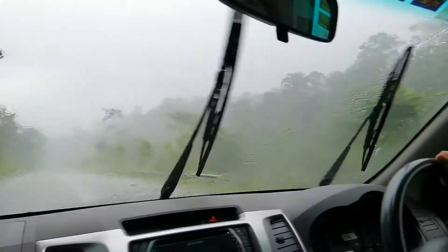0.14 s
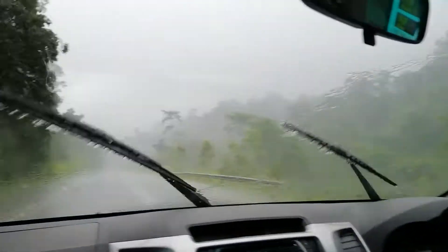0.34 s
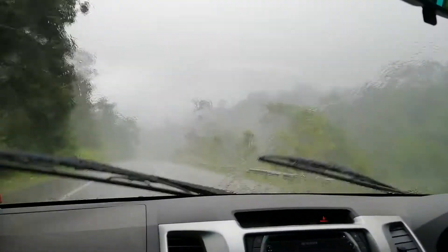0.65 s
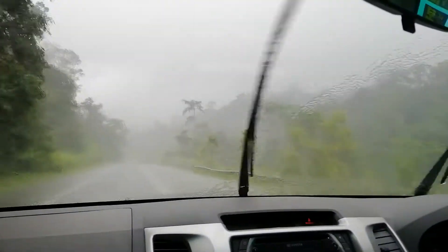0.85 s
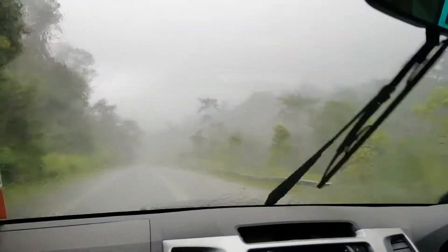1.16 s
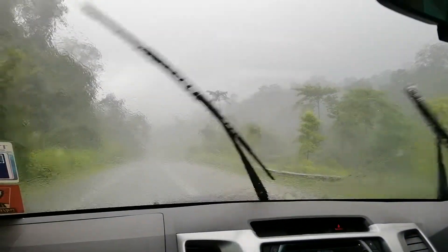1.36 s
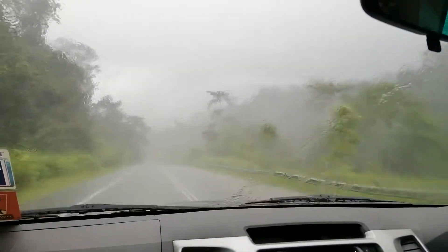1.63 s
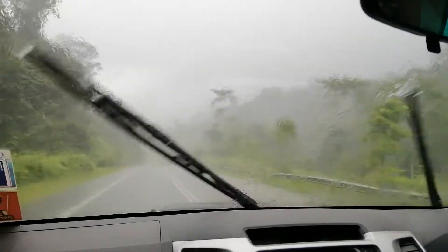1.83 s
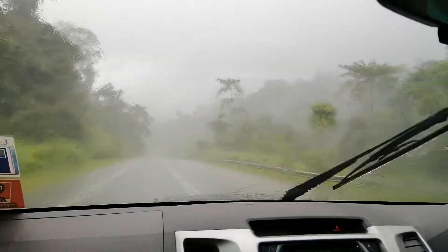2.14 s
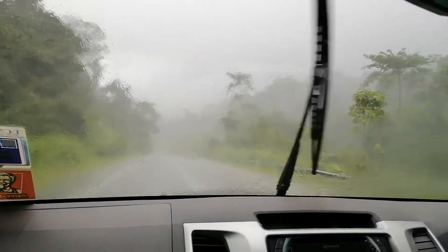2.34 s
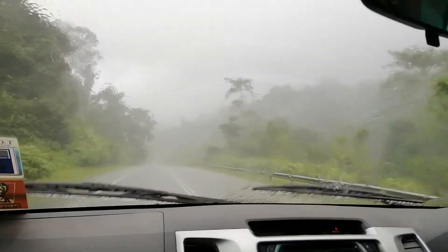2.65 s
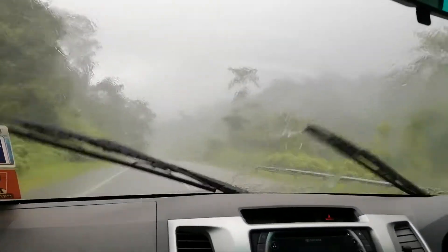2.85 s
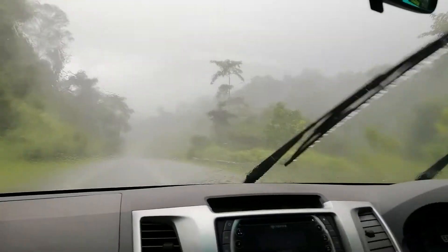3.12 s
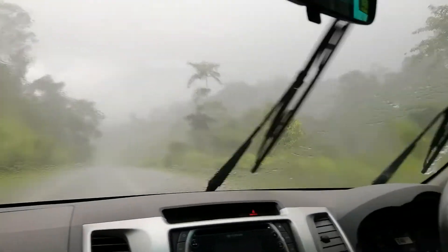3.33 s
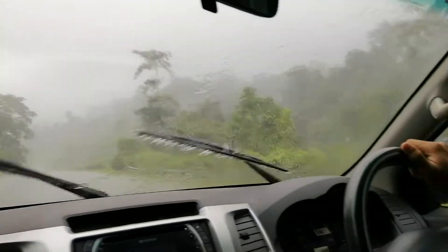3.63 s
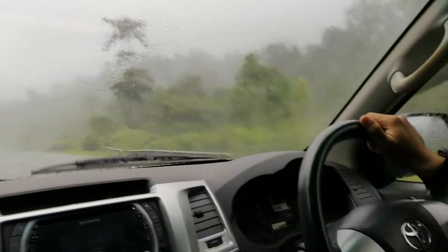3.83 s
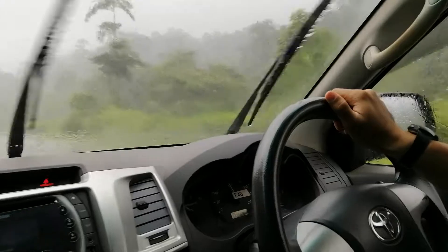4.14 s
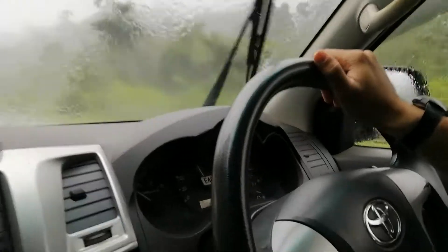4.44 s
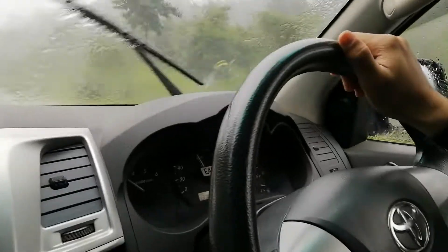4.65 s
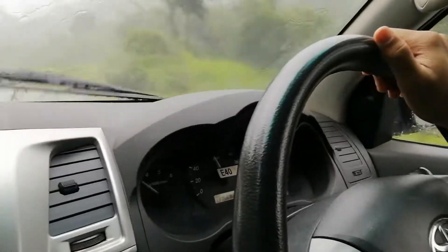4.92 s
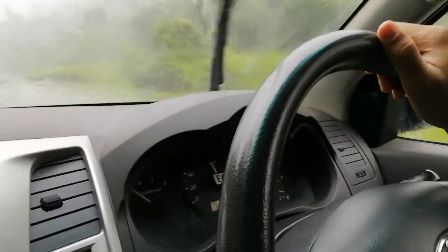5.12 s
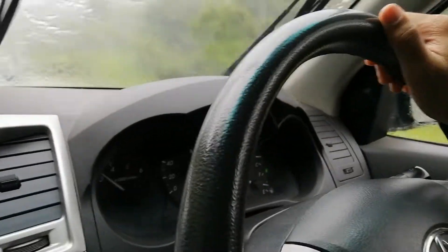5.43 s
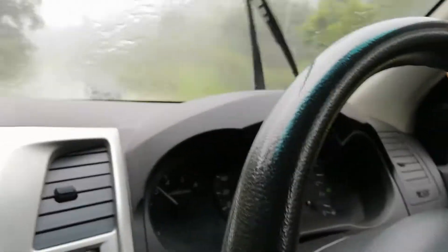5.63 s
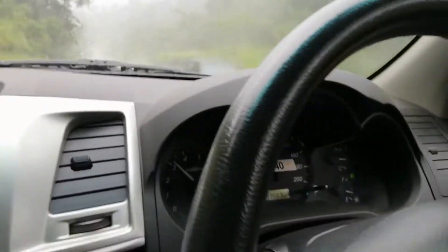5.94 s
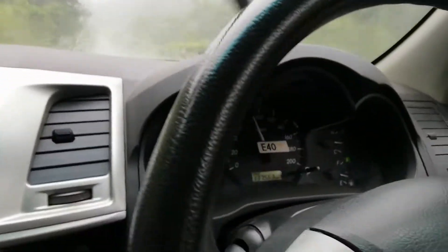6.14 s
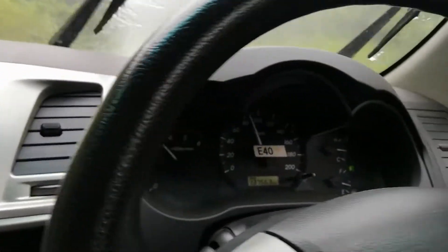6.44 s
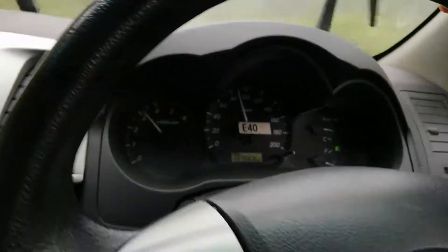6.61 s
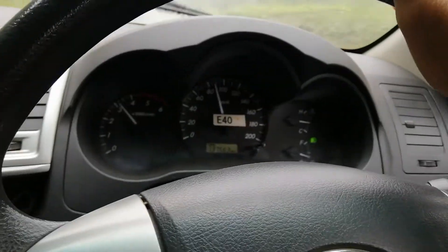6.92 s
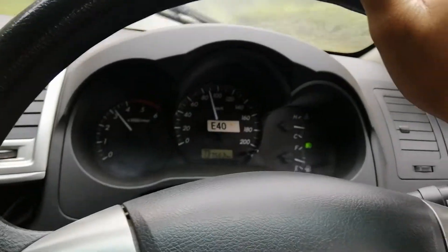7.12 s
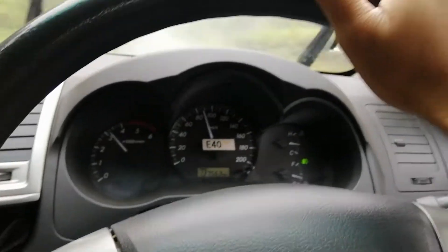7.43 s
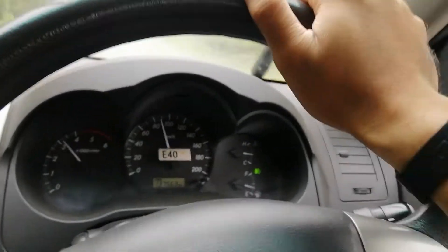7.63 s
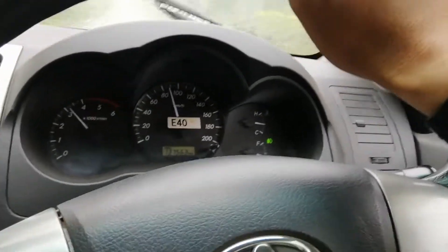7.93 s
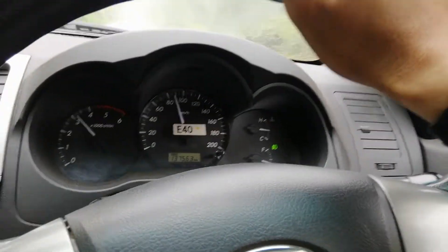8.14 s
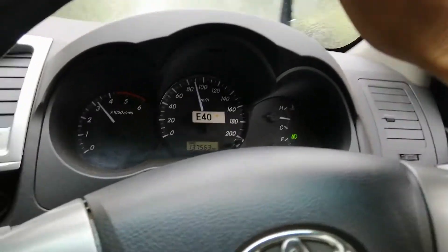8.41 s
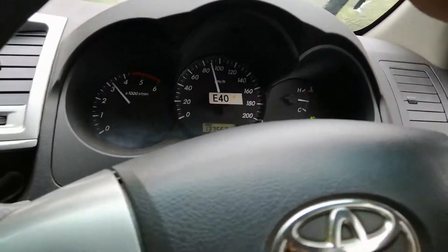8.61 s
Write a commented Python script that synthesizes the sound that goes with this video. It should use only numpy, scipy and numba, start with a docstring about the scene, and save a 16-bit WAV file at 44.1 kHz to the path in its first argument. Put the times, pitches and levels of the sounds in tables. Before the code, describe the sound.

A deep engine drone fills a vehicle cabin while a cloudburst hammers windscreen and bodywork, with occasional metallic drop pings and faint wiper taps.

```python
"""A four-cylinder diesel booms in a pickup cabin and eases off half way: sines at the firing rate and crank orders.
Drive-line sines throb in step with it; filtered noise makes the tyre rumble, with one brief drumming of the body.
A cloudburst patters on the windscreen and rings the panels: random hits shaped by the spectra of glass and metal.
A few fat drops ping as damped sines; the wipers tap faintly, as band-passed noise bursts, at each turn."""
import sys
import numpy as np
from scipy import signal
from scipy.fft import rfft, irfft
from scipy.io import wavfile
from scipy.ndimage import uniform_filter1d
from numba import njit

SR = 44100
rng = np.random.default_rng(int(sys.argv[2]) if len(sys.argv) > 2 else 0)


def store_wav(level_fs):
    """Save 16-bit WAV to argv[1]."""
    pcm = np.round(np.clip(np.atleast_2d(level_fs), -1, 1) * 32767)
    wavfile.write(sys.argv[1], SR, pcm.T.astype(np.int16))


N = 386757
TIME = np.arange(N) / SR  # s
FREQS = np.maximum(np.fft.rfftfreq(N, 1 / SR), 1)  # Hz
SIDES = np.array([[1], [-1]])  # left, right
SHORT_TIME = TIME[:2048]  # s, span of one hit


def undb(db):
    """Decibels to amplitude gain."""
    return 10 ** (np.asarray(db) / 20)


def unit(x):
    """Scale to rms 1."""
    return x / np.sqrt(np.mean(x ** 2))


def curves(table):
    """Columns of a time table, interpolated to every sample."""
    time_s, *columns = np.transpose(table)
    return [np.interp(TIME, time_s, column) for column in columns]


def across(table):
    """Columns of a frequency table, interpolated on a log-frequency axis."""
    freq_hz, *columns = np.transpose(table)
    return np.array([np.interp(np.log(FREQS), np.log(freq_hz), column) for column in columns])


def colour(x, gain):
    """Filter by a gain per frequency."""
    return irfft(rfft(x) * gain, N)


def bell(centre_hz, relative_width):
    """Gaussian band on a log-frequency axis, peak 1."""
    return np.exp(-(np.log(FREQS / centre_hz) / relative_width) ** 2)


def swell(at_s, width_s):
    """Smooth rise and fall around one moment, peak 1."""
    return np.exp(-((TIME - at_s) / width_s) ** 2)


def walk(rate_hz):
    """Smooth random drift, rms 1: random steps at rate_hz, averaged over one step."""
    step = int(SR / rate_hz)
    steps = np.repeat(rng.standard_normal(N // step + 1), step)
    return unit(uniform_filter1d(steps, step)[:N])


def decay(t60_s):
    """Exponential decay, down 60 dB after t60_s."""
    return np.exp(-np.log(1000) * SHORT_TIME / t60_s)


def add(track, start_s, sound):
    """Mix a short stereo sound into a track."""
    i = int(start_s * SR)
    track[:, i:i + sound.shape[1]] += sound[:, :N - i]


# firing rate, sags as the throttle eases, then creeps back: time_s, firing_hz
FIRING_RATE = [(0, 109.6), (1.0, 108.9), (3.3, 108.8), (4.08, 108.6), (4.25, 106.4), (4.42, 107.8),
               (5.1, 105.7), (5.65, 106.8), (5.9, 106), (7.3, 107.3), (8.77, 107.4)]
# throttle: time_s, load (0-1)
THROTTLE = [(0, 0.99), (3.9, 0.65), (4.4, 0), (8.77, 0)]
# cabin boom before the dip: time_s, level_db
BOOM_LEVEL = [(0, -12.4), (3.3, -12.0), (4.0, -12.5), (4.75, -12.0), (5.15, -13), (5.45, -14), (6.25, -13),
              (7.2, -14.2), (7.9, -13.5), (8.55, -15.5), (8.77, -12.5)]
DIP_S, DIP_WIDTH_S, DIP_DB = 0.16, 0.04, -4.5  # the boom dips briefly
# crank orders, levels relative to the boom: order (x crank rate), loaded_db, eased_db
CRANK_ORDERS = [(2.5, -23.5, -22), (3, -17, -36), (3.5, -27, -34), (4, -33, -26.5), (4.5, -24, -35),
                (5, -37, -33), (5.5, -48, -41), (6, -44, -29.5), (6.5, -49, -35.5), (9, -35, -39.5)]
# shaft and tyres: ratio (x firing rate), level_db
DRIVE_LINE = [(.352, -26.8), (3.55, -49), (3.89, -52), (4.11, -48)]


def engine():
    """The firing rate excites a cabin resonance; weaker crank orders waver and change with load."""
    firing_hz, = curves(FIRING_RATE)
    load, = curves(THROTTLE)
    boom_db = curves(BOOM_LEVEL)[0] + DIP_DB * swell(DIP_S, DIP_WIDTH_S)
    firing_rad = 2 * np.pi * np.cumsum(firing_hz) / SR
    out = np.sin(firing_rad + 0.11 * SIDES) * undb(0.27 * walk(14))
    for order, loaded_db, eased_db in CRANK_ORDERS:
        # two crank turns hold four firings: order / 2 per firing, in quarter steps
        phase_rad = round(2 * order) / 4 * firing_rad + 2 * np.pi * rng.random() + 0.13 * walk(6)
        level_db = eased_db + load * (loaded_db - eased_db) + 1.1 * walk(7.4)
        out = out + undb(level_db) * np.sin(phase_rad + 0.036 * order * SIDES)
    out = out * undb(boom_db)
    # in gear, shaft and tyres turn in step with the engine
    for ratio, level_db in DRIVE_LINE:
        wavering_db = level_db + 1.6 * walk(7)
        out = out + undb(wavering_db) * np.sin(ratio * firing_rad + 0.35 * walk(6))
    return np.sqrt(2) * out


# listener leans from windscreen to driver's door: time_s, door_share (0-1)
DOOR_SHARE = [(0, 0.03), (4.8, 0.04), (5.8, 0.03), (6.5, 0.81), (8.77, 0.95)]


def lean():
    """Door share over time: 0 at the windscreen, 1 at the door."""
    return curves(DOOR_SHARE)[0]


# tyre rumble spectrum, relative density: freq_hz, level_db
ROAD_SPECTRUM = [(15, -15), (33, 7), (48, 0), (65, 1.5), (85, -1.5), (130, -1.5), (190, -3.5), (275, -14.5),
                 (390, -14.5), (480, -17.5), (570, -20.5), (900, -25), (2000, -57)]
# left/right likeness of the rumble: freq_hz, correlation (-1 to 1)
ROAD_CORRELATION = [(40, 0.98), (130, 1), (200, 0.8), (300, 0.44), (420, -0.083), (560, -0.64),
                    (900, -0.92)]


def road(mean_db=-24.0, arch_db=3.0):
    """Tyre rumble through the body: bass fills the cabin evenly, higher modes oppose from side to side."""
    likeness = np.clip(across(ROAD_CORRELATION), -1, 1)
    spectrum = undb(across(ROAD_SPECTRUM))
    mid = colour(rng.standard_normal(N), spectrum * np.sqrt(1 + likeness))
    side = colour(rng.standard_normal(N), spectrum * np.sqrt(1 - likeness))
    rumble = unit(mid + SIDES * side) * undb(mean_db + 1.14 * walk(5))
    # water thrown into the wheel arch roars more near the door
    arch = colour(rumble, bell(400, 0.21))
    return rumble + (undb(arch_db * lean()) - 1) * arch


def rough_patch(at_s=6.45, width_s=0.17, centre_hz=67, peak_db=-20):
    """The body drums briefly over rougher road: one low sine of drifting pitch."""
    drum_hz = centre_hz + 3 * walk(16)
    drum = np.sqrt(2) * np.sin(2 * np.pi * np.cumsum(drum_hz) / SR)
    return drum * undb(peak_db) * swell(at_s, width_s)


def impact(t60_s, cabin_db, cabin_t60_s=0.089):
    """One struck spot: noise crack plus the cabin's dry tail, independent on each side."""
    envelope = decay(t60_s) + undb(cabin_db) * decay(cabin_t60_s)
    return unit(rng.standard_normal((2, len(SHORT_TIME))) * envelope)


def drops(rate_hz, spread_db, t60_s, cabin_db, spots=12):
    """Drops of very unequal size land at random times on a number of spots."""
    out = 0
    for _ in range(spots):
        lands = rng.random(N) < rate_hz / spots / SR
        size = np.minimum(rng.standard_exponential(N), 5)
        hits = np.zeros(N)
        hits[lands] = undb(spread_db * size[lands])
        out = out + signal.oaconvolve(hits[None], impact(t60_s, cabin_db), axes=1)[:, :N]
    return unit(out)


# patter on glass, relative density: freq_hz, left_db, right_db
GLASS_SPECTRUM = [(400, -16, -18.5), (693, 0.5, 0), (1290, -1, 0), (2580, 0, -4), (3160, 0.5, -2.5),
                  (3590, 1, -1), (4220, -4, -3.5), (5700, -3.5, -3.5), (6400, -10, -8), (7500, -7, -5),
                  (8450, -14, -13), (9450, -16, -8.5), (10950, -9.5, -12.5), (13900, -25, -24.5)]
SIZZLE_HZ, SIZZLE_RELATIVE_WIDTH, SIZZLE_DB = 9400, 0.12, 3  # gain at full lean


def windscreen(patter_db):
    """Sharp ticks on glass over fine spray, shaped by the glass spectrum."""
    ticks = drops(rate_hz=4200, spread_db=3.5, t60_s=0.005, cabin_db=-15) * undb(0.6 * walk(35))
    spray = undb(-3.5) * rng.standard_normal((2, N))
    water = unit(ticks + spray) * undb(patter_db)
    patter = colour(water, unit(undb(across(GLASS_SPECTRUM))))
    # spray on the side window sizzles more as the listener leans
    sizzle = colour(patter, bell(SIZZLE_HZ, SIZZLE_RELATIVE_WIDTH))
    return patter + (undb(SIZZLE_DB * lean()) - 1) * sizzle


def ping(pitch_hz, t60_s):
    """One damped panel mode, with its own phase on each side and a soft 0.28 ms onset."""
    tone = np.sin(2 * np.pi * (pitch_hz * SHORT_TIME + rng.random((2, 1))))
    return tone * decay(t60_s) * (1 - np.exp(-SHORT_TIME / 0.00028))


def tinkle(rate_hz=260, low_hz=1550, high_hz=2600, t60_s=0.049):
    """Middling drops, each ringing a panel briefly at its own pitch."""
    out = np.zeros((2, N))
    for when, pitch, size in rng.random((int(rate_hz * N / SR), 3)):
        pitch_hz = low_hz * (high_hz / low_hz) ** pitch
        add(out, when * TIME[-1], undb(7.3 * size) * ping(pitch_hz, t60_s))
    return unit(out)


# panel rings, relative density: freq_hz, left_db, right_db
BONNET_SPECTRUM = [(900, -25, -21), (1300, -8.5, -11), (1480, -5, -4.5), (1700, -3.5, 0),
                   (2040, -0.5, -1.5), (2280, -5, -4.5), (2840, -7.5, -11.5), (3240, -21, -20),
                   (5000, -37, -37)]
DOOR_SPECTRUM = [(810, -19, -15), (1190, -8, -11), (1600, -11.5, -4.5), (1870, -16, -5), (2040, -6, 3.5),
                 (2300, -13, -1), (2730, -9, -5), (3140, -20, -19), (5000, -35, -40)]
# fat drops on sheet metal, level before onset and decay: start_s, level_db, pitch_hz
FAT_PINGS = [(0.244, -22, 1680), (2.013, -21, 1960), (2.844, -24, 1830), (3.885, -25, 2117),
             (5.735, -21, 1690), (7.048, -17, 2053), (7.674, -13.5, 2010), (8.691, -14, 1880)]


def panels(ring_db, tinkle_db=-5):
    """Drops drum on the damped sheet metal of bonnet and door; the fattest stand out as pings."""
    door_share = np.clip(lean(), 0, 1)
    hits = drops(rate_hz=2200, spread_db=2.0, t60_s=0.023, cabin_db=-10)
    tinkles = tinkle()
    out = 0
    for spectrum, share in ((BONNET_SPECTRUM, 1 - door_share), (DOOR_SPECTRUM, door_share)):
        body = undb(across(spectrum))
        drumming = unit(colour(hits, body))
        ringing = undb(tinkle_db) * unit(colour(tinkles, body))
        out = out + np.sqrt(share) * unit(drumming + ringing)
    out = out * undb(ring_db)
    for start_s, level_db, pitch_hz in FAT_PINGS:
        add(out, start_s, undb(level_db) * ping(pitch_hz, t60_s=0.035))
    return out


# heavier sheets of rain that the truck drives through: centre_s, half_width_s, extra_db
RAIN_SHEETS = [(0, .12, 1.5), (.68, .12, 0.7), (2.35, .3, 0.2), (4.45, 0.15, 1.4), (5.33, 0.43, 1.6),
               (5.95, 0.12, 1.4), (7.45, .25, 1.05), (8.62, 0.3, 0.5)]
FLUTTER_DB, FLUTTER_HZ = 0.44, 14
SWEEP_LEAD_S, SWEEP_WIDTH_S, SWEEP_DB = 0.2, 0.06, -0.46  # rain thins before each wiper turn


def downpour():
    """Rain strength in dB: heavier sheets, a lull with each wiper sweep, random flutter."""
    sheets_db = sum(extra_db * swell(at_s, width_s) for at_s, width_s, extra_db in RAIN_SHEETS)
    sweeps = sum(swell(turn_s - SWEEP_LEAD_S, SWEEP_WIDTH_S) for turn_s in BLADE_TURNS)
    return sheets_db + SWEEP_DB * sweeps + FLUTTER_DB * walk(FLUTTER_HZ)


@njit
def resonance(x, centre_hz, width_hz):
    """State-variable band-pass with a centre given per sample."""
    y, band, low = np.empty(len(x)), 0., 0.
    for i in range(len(x)):
        g = np.tan(np.pi * centre_hz[i] / SR)
        damping = width_hz / centre_hz[i]
        v = (band + g * (x[i] - low)) / (1 + g * (g + damping))
        band = 2 * v - band
        low = low + 2 * g * v
        y[i] = damping * v
    return y


# blades flip over at the foot of the windscreen: start_s
BLADE_TURNS = [.585, 1.669, 2.701, 3.821, 4.9, 5.941, 7.048, 8.104]


def wipers(rms_db=-48, centre_hz=1250.0, width_hz=700.0):
    """Each rubber blade lands with a soft, dull tap: a band-passed noise burst."""
    taps = np.zeros((2, N))
    for turn_s in BLADE_TURNS:
        add(taps, turn_s, impact(t60_s=0.069, cabin_db=-8))
    dull = np.array([resonance(side, np.full(N, centre_hz), width_hz) for side in taps])
    return unit(dull) * undb(rms_db)


PATTER_DB, RING_DB = -28, -30.5  # steady rain on glass and panels
APPROACH_FROM_S, APPROACH_TO_S, APPROACH_DB = 5.1, 6.9, 2.5  # panels grow louder towards the driver's side


def scene():
    """Sum as heard from the front seat; one downpour drives glass and panels."""
    rain_db = downpour()
    nearer_db = np.interp(TIME, [APPROACH_FROM_S, APPROACH_TO_S], [0, APPROACH_DB])
    rain = windscreen(PATTER_DB + rain_db) + panels(RING_DB + rain_db + nearer_db)
    return engine() + road() + rough_patch() + rain + wipers()


def record(dry, top_hz=14700):
    """Steep elliptic low-pass cuts the top of the treble."""
    low_pass = signal.ellip(10, 0.2, 80, top_hz, fs=SR, output="sos")
    return signal.sosfilt(low_pass, dry)


dry = scene()
out = record(dry)
store_wav(out)
```